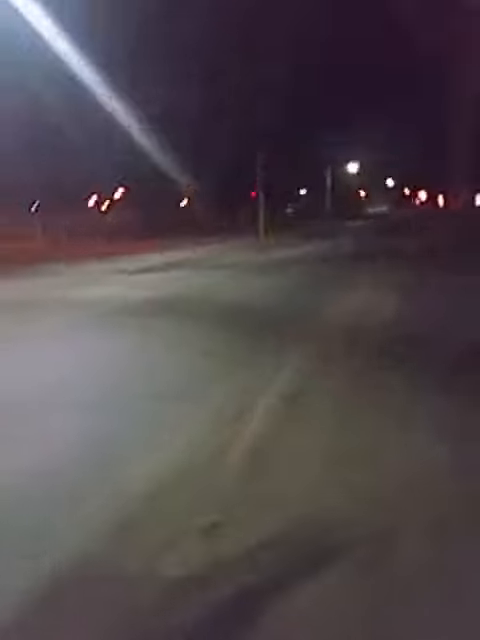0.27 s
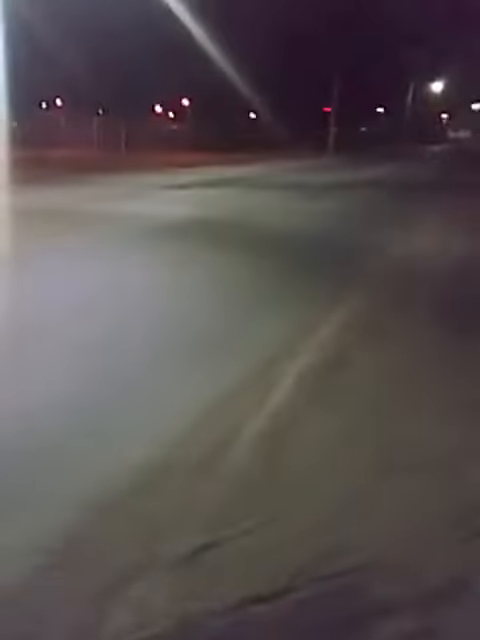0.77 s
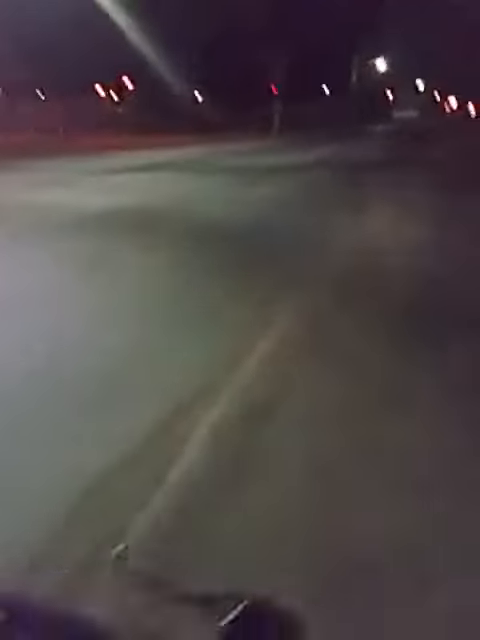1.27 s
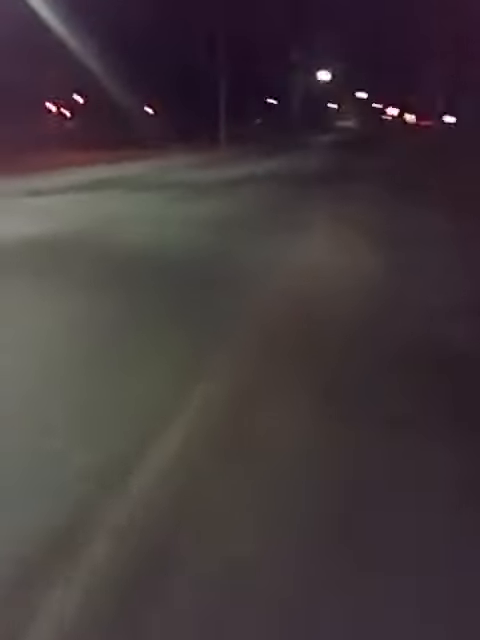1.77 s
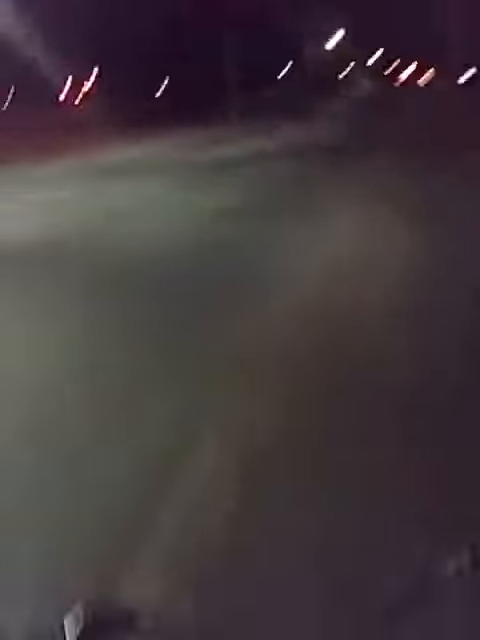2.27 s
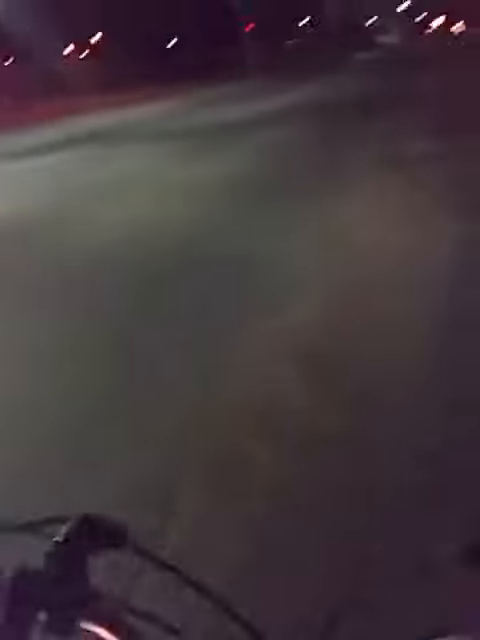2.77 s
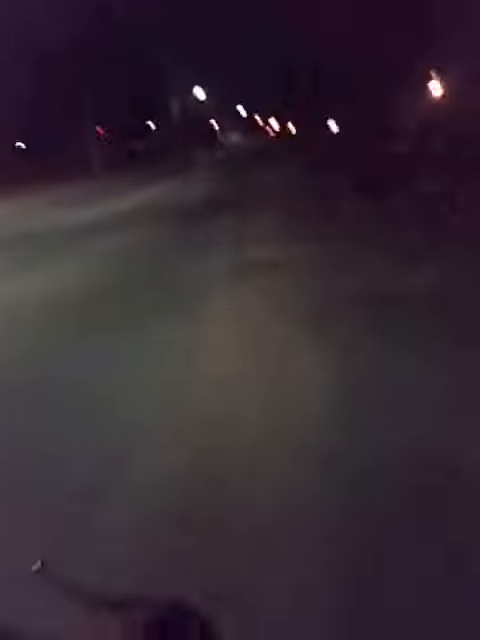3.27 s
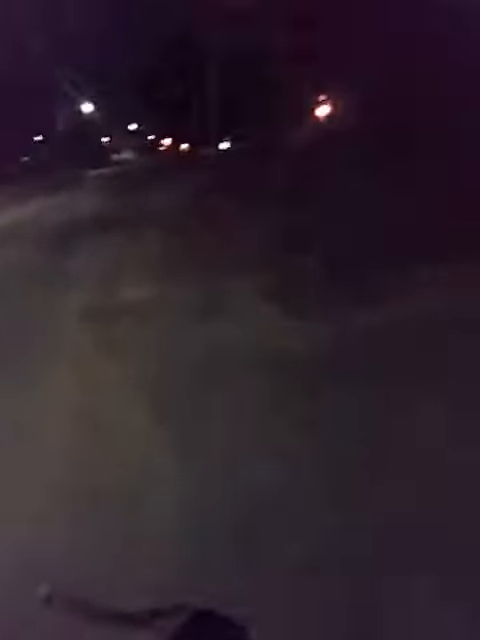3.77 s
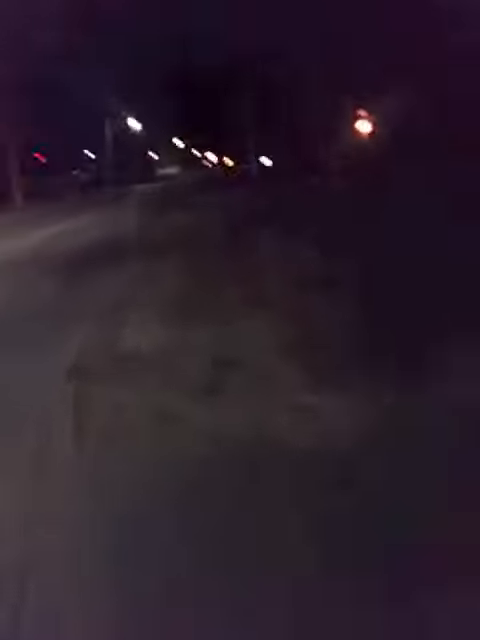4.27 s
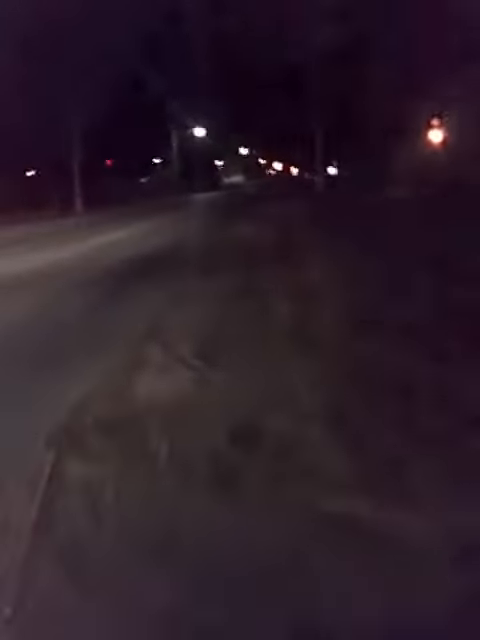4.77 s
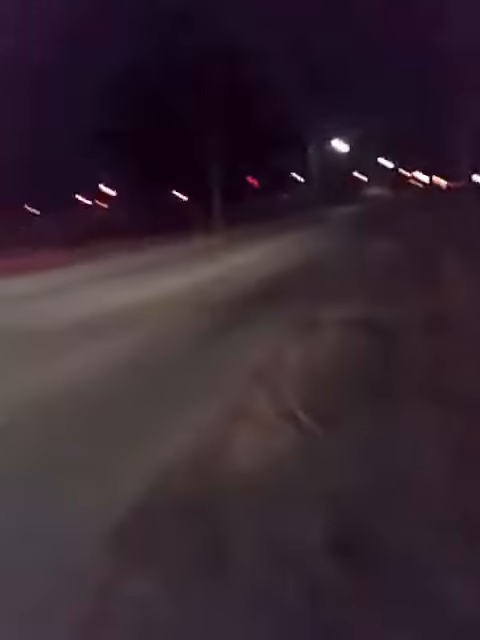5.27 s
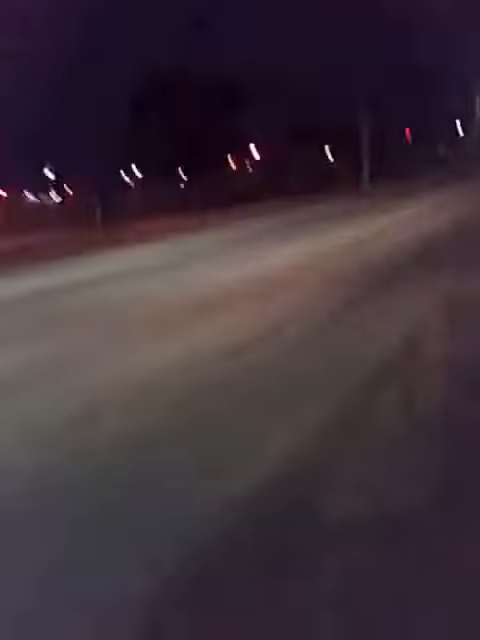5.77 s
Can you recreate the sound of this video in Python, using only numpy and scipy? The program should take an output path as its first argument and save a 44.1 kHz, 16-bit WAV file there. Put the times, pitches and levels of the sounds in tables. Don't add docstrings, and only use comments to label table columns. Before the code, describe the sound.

Small motorbike engine drones low and slowly climbs while wind thumps, a stiff jacket crackles, a buckle ticks, and a car's tyre roar swells.

```python
import sys
import numpy as np
from scipy import signal
from scipy.fft import rfft, irfft, next_fast_len
from scipy.io import wavfile
from scipy.ndimage import map_coordinates

SR = 44100
rng = np.random.default_rng(int(sys.argv[2]) if len(sys.argv) > 2 else 0)


def wav_out(sig):
    wavfile.write(sys.argv[1], SR, np.round(np.clip(np.atleast_2d(sig).T, -1, 1) * 32767).astype(np.int16))


def volts(x):
    e = np.asarray(x, float) / 20
    return 10 ** e


N = 266408
CONTROL_S = np.arange(0, 6.1, .002)
START_S, FADE_S = .4, 1.553


def unit(x):
    return x / np.sqrt(np.mean(x ** 2, axis=-1, keepdims=True) + 1e-20)


def along(points, hz):
    f, v = np.transpose(points)
    return np.interp(np.log(hz + 1), np.log(f + 1), v)


def curves(rows):
    s, *cols = np.transpose(rows)
    return [np.interp(np.arange(N) / SR, s, c) for c in cols]


def smooth(rows):
    return np.array(curves(np.transpose([CONTROL_S, *rows])))


def bumps(rows):
    changes = 0
    for s, length, *db in rows:
        changes = changes + np.exp(-((CONTROL_S - s) * 2 / length) ** 2) * np.array(db)[:, None]
    return smooth(changes)


def eddies(rows, half_s):
    size = 0
    for s, db, side_db in rows:
        bell = np.exp(-((CONTROL_S - s) / half_s) ** 2)
        size = size + volts(db) * panned(side_db)[:, None] * bell
    return smooth(size)


def wobble(rate):
    knots = rng.standard_normal(int(N * rate / SR) + 4)
    return map_coordinates(knots, [np.arange(N) * rate / SR])


def filtered(x, response):
    m = next_fast_len(N + 8192)
    return irfft(rfft(x, m) * response(np.fft.rfftfreq(m, 1 / SR)), m)[..., :N]


def coloured(x, spectrum):
    return unit(filtered(x, lambda hz: volts(along(spectrum, hz))))


def noise():
    return rng.standard_normal((2, N))


def panned(pan_db):
    pair = volts(np.array([pan_db / 2, -pan_db / 2]))
    return pair / np.sqrt(np.mean(pair ** 2, axis=0))


def lagged(x, seconds):
    return filtered(x, lambda hz: np.exp(-1j * np.pi * hz * seconds * np.array([[1], [-1]])))


# time_s, roar_db, treble_lift_db
CAR = [
    (.4, -44, 8),
    (1.2, -47.5, 14.5),
    (1.8, -45, -0.5),
    (3.34, -47.5, 2.5),
    (3.84, -40, -1),
    (4.83, -44, 6.5),
    (5.6, -37.5, 6.5),
    (6.04, -34.5, 8.5),
]
# frequency_hz, density_db
TYRES = [(200, -6), (400, 1.5), (800, 6), (1050, -1), (1300, -8), (1750, -12.5), (2200, -18), (3500, -29),
         (8000, -37)]


def car():
    level_db, bright_db = curves(CAR)
    direct_share = np.clip(curves([(2.6, 0.17), (3.6, 0.41), (5.2, 0.63), (5.8, 0.88)])[0], 0, 1)
    roar = rng.standard_normal((3, N)) * volts(0.53 * wobble(30))

    def around_rider(hz):
        phase = np.interp(hz, [700, 950, 1410, 2260], [0, .4, .8, 2.8])
        return np.exp(.5j * phase * np.array([[-1], [1]]))

    direct = filtered(roar[0], around_rider)
    scattered = filtered(roar[1:], lambda hz: 1 / (1 + (700 / (hz + 1)) ** 2))
    pair = np.sqrt(direct_share) * direct + np.sqrt(1 - direct_share) * scattered
    low = filtered(coloured(pair, TYRES), lambda hz: 1 + 0.51 / (1 + ((hz - 966) / 26) ** 2))
    high = filtered(low, lambda hz: 1 / (1 + (1250 / (hz + 1)) ** 6))
    return volts(level_db + 2.0) * (low + (volts(bright_db) - 1) * high) * volts([[1.2], [-1.2]])


# time_s, level_db
HISS = [(.4, -32), (.7, -27), (.8, -25), (1.0, -33), (1.18, -35), (1.24, -56), (1.6, -60), (1.78, -32),
        (1.9, -32), (2.1, -29), (2.2, -35), (2.27, -59), (2.6, -44), (3.6, -43), (4.4, -61), (5.0, -60),
        (6.04, -32.5)]
# frequency_hz, density_db
AIR = [(1500, -29), (2500, 4), (4000, -0.5), (6000, -6.5), (8000, -4), (12500, -1), (14500, 10),
       (15800, -4)]


def hiss():
    level_db, = curves(HISS)
    return volts(level_db + 0.94 * wobble(30.4)) * coloured(noise(), AIR) * volts([[0], [-6]])


# centre_s, peak_db, quarter_of_left_minus_right_db
FLICKS = [(0.699, -27, -4), (0.759, -40, -8), (0.869, -24.5, 3), (0.919, -30, 4), (1.099, -48, 1),
          (1.179, -24, -11), (1.319, -26, -2), (1.389, -18.5, -12.0), (1.459, -18, -6), (1.649, -29, -11),
          (1.755, -20, -14.5), (1.823, -19.5, -8), (2.036, -20, -12), (2.095, -21.5, -10), (2.208, -15, -9),
          (2.241, -16, -10.5), (2.365, -26, 2), (2.615, -37, 1), (2.69, -33, -1), (3.099, -27, -3),
          (3.229, -29, -4), (3.569, -22, -11), (4.069, -28, -1), (4.399, -30, -4), (4.481, -21, -2),
          (4.569, -22, -10), (4.899, -35, -3), (5.079, -27, -2)]
# frequency_hz, density_db
FLICK = [(60, -26), (120, 14.5), (300, 6), (500, -5.5), (800, -20), (1500, -45)]


def flicks():
    rows = []
    for s, db, side_db in FLICKS:
        fade_db = 20 * np.log10(min((s - START_S) / FADE_S, 1))
        rows.append((s, db - fade_db, 4 * side_db))
    return volts(0.5) * eddies(rows, 0.015) * coloured(noise(), FLICK)


# time_s, buffeting_db, left_minus_right_db, large_eddies_db
WIND = [(.4, -14.5, -22, -6), (.6, -22.5, -17, 0), (.75, -12, -9, -7), (1.0, -17.5, 14, -6),
        (1.25, -24, -14, 5), (1.46, -18.5, -23, -8), (1.6, -21.5, -22, 5), (1.8, -19.5, -14, -5),
        (2.0, -24.5, -9, -1), (2.2, -24, -5, 2), (2.6, -30.5, 3, 6), (3.05, -33, 6, 10),
        (3.45, -30.5, -6, -4), (3.85, -33, -9, 1), (4.2, -32, -6, 3), (4.55, -31, -22, -2),
        (4.9, -31, -10, 6), (5.3, -33, 0, 1), (5.8, -38, 14, 8)]
# centre_s, peak_db, left_minus_right_db
GUSTS = [(0.937, -14, -12), (1.011, -1.5, 20), (2.404, -17, -11), (3.034, -23, -10), (3.34, -15, -16),
         (3.433, -12.5, -22), (3.562, -15, -4), (3.717, -19, 10), (3.882, -19.5, -17), (4.086, -21, -3),
         (4.361, -30, -9), (4.58, -18, 7), (4.664, -24, -14), (5.583, -20, -20)]
# frequency_hz, density_db
BUFFET = [(15, -33), (35, -3.5), (70, 1), (130, 4), (250, -8.5), (500, -26), (1000, -48), (2500, -56)]


def wind():
    sway = np.array([.8 * wobble(8), 2.5 * wobble(8), 0.6 * wobble(4.7)])
    level_db, pan_db, deep_db = curves(WIND) + sway
    lumps = unit(volts([.8 * wobble(18) + 2.2 * wobble(45) for _ in "LR"]))
    size = volts(level_db + 5.0) * panned(pan_db) * lumps
    size = size + volts(-3.0) * eddies(GUSTS, 0.02)
    beats = filtered(size * noise(), lambda hz: volts(along(BUFFET, hz)))
    bright = np.clip((level_db + 25.0) / 8, 0, 1.5)
    small = filtered(beats, lambda hz: 1 / (1 + (260 / (hz + 1)) ** 4))
    beats = beats + (volts(2.6 * bright - 7.5) - 1) * small
    large = filtered(beats, lambda hz: 1 / (1 + (hz / 62) ** 6))
    beats = beats + (volts(deep_db) - 1) * large
    return beats * np.sqrt(np.mean(size ** 2) / np.mean(beats ** 2))


# start_s, peak_db
TAP = (.639, -.3)


def tap():
    start_s, peak_db = TAP
    u = np.clip(np.arange(N) / SR - start_s, 0, None)
    push = (1 - np.exp(-u / 0.000062)) * np.exp(-u / 0.0029) * np.cos(2 * np.pi * 110 * u)
    return volts(peak_db) * push * volts([[0], [-20]])


# start_s, peak_db, pitch_hz
TICKS = [(1.2166, -20, 2530), (1.6709, -20.5, 2740), (2.158, -21.5, 3200), (2.235, -26, 3020),
         (2.392, -28.5, 2240), (2.747, -19, 2500), (2.77, -25, 3400), (1.3902, -24.5, 3150),
         (2.4752, -25, 2010), (2.755, -10.5, 2530), (2.7807, -12.5, 2350), (2.861, -6, 3000),
         (2.926, -19.5, 2580), (3.2406, -22, 3320), (3.276, -24, 2330), (3.78, -17, 3000)]


def buckle():
    sag_per_s = 29
    lag_s = .00032
    out, t = np.zeros((2, N + SR)), np.arange(SR // 50) / SR
    for s, db, hz in TICKS:
        decay = volts(-60 * t / [[.0045], [.0036]])
        ring = decay * np.sin(2 * np.pi * hz * t * [[1.04], [.8]] * (1 - sag_per_s * t))
        out[:, round(s * SR):][:, :len(t)] += volts(db + 11) * (1 - np.exp(-t / 0.0007)) * ring
    upper = lagged(out[0, :N], lag_s) * volts([[-2.5], [1.5]])
    lower = lagged(out[1, :N], lag_s) * volts([[-1.5], [-9]])
    return upper + lower


# start_s, length_s, crisp_db, left_minus_right_db, rub_over_crisp_db
STROKES = [(0.404, 0.14, -24, -15, -10), (0.52, .2, -31, -10, -8), (.69, 0.15, -23.5, -14, -18),
           (0.873, 0.11, -31, -6, -18), (0.973, 0.22, -31, -9, -11.5), (1.296, 0.035, -28.5, -12, -5),
           (1.347, .2, -39.5, -16, -6.5), (1.58, 0.073, -34.5, -14, -6), (1.645, 0.083, -32.5, -17, -2),
           (1.719, 0.076, -32, -7, -5), (1.796, 0.12, -37, 10, -3.5), (1.91, .11, -37.5, 6, 1),
           (2.031, 0.062, -30.5, -6, -3.5), (2.111, 0.1, -34.5, -14, 0), (2.216, 0.1, -51, -2, 2),
           (2.398, 0.19, -39.5, -3.5, -2), (2.52, 0.21, -36.5, -10, -3.5), (2.741, 0.11, -35.5, -10, -3),
           (2.862, 0.12, -33.5, -10, -5), (2.992, 0.088, -32.5, -5, -11), (3.052, 0.14, -32.5, -7, -7),
           (3.191, 0.11, -33, -22, -4.5), (3.305, 0.15, -34.5, -24, -6), (3.412, .19, -33, -12, -10),
           (3.637, 0.15, -33, -14, -7), (3.767, 0.082, -28.5, -14, -12.5), (3.856, 0.044, -32.5, -15, -8),
           (3.92, 0.14, -38, -18, -7.5), (4.081, 0.083, -31.5, -10, -8), (4.18, 0.11, -36.5, -9, -29),
           (4.32, 0.13, -40.5, -10, -25), (4.472, 0.12, -32, -9, -12), (4.588, 0.24, -42, -12, -10),
           (4.795, 0.11, -33.5, -13.5, -7), (4.931, 0.06, -37, -17, -25), (5.035, 0.051, -28, -9, -11),
           (5.13, 0.067, -37.5, -8, -7), (5.207, 0.081, -37.5, -12, -10), (5.302, 0.22, -33, -11, -9),
           (5.554, 0.11, -42, -10, -9), (4.726, 0.077, -44, -10, -10), (5.665, 0.31, -31.5, -9.5, -8.5)]


def strokes():
    attack_s, release_s = 0.046, 0.067
    flapping = (-1, 9, -42.5, -26, -3.5)
    t, power = CONTROL_S, 0
    for s, length, db, pan_db, rub_db in STROKES + [flapping]:
        rise, fall = (t - s) / attack_s, (s + length + release_s - t) / release_s
        shape = np.clip(np.minimum(rise, fall), 0, 1) ** 1.16
        gains = volts(db) * np.append(panned(pan_db), volts(rub_db))
        power = power + (gains[:, None] * shape) ** 2
    gains = smooth(np.sqrt(power))
    return gains[:2], gains[2]


# start_s, peak_db, left_minus_right_db, body_db
SNAPS = [(.448, -4, -16, -32), (0.477, -3, -18, -28), (.512, -2, -18, -26), (0.7926, -10, -12, -33),
         (0.837, -9, -8, -26), (1.0198, -13, -12, -17), (1.2424, -19, -8, -10.5), (1.341, -10, -6, -17),
         (1.465, -21, -10, -27), (1.5983, -19, -12, -31), (1.676, -22, -12, -25), (1.7265, -23, -11, -25),
         (1.946, -15, 1, -22), (2.007, -17, -1, -22), (2.395, -27, -4, -26), (3.1498, -16.5, -4, -15),
         (3.252, -12, -13, -28), (3.6912, -28, -9.5, -31), (3.9675, -18.5, -9, -23), (4.2612, -19, -5, -36),
         (4.412, -28, -9, -25), (5.173, -22, -8, -32), (5.441, -16.5, -7, -24), (5.5768, -20, -11, -17),
         (1.1533, -5, -13, -35), (1.2687, -17, -9, -18), (1.322, -16, -11, -21), (1.6917, -9, -15, -36),
         (1.813, -14, -6, -31), (2.1064, -10, -9, -25), (2.315, -15, -5, -27), (2.3377, -15.5, -2, -23),
         (2.7643, -14, -5, -21), (3.0087, -14.5, -8, -37), (3.088, -17, -4, -29), (3.4634, -16, -7, -29),
         (3.4893, -13, -12, -22), (3.516, -15, -13, -30), (3.545, -14.5, -8.5, -20), (3.897, -15, -6, -31),
         (4.326, -4.5, -8, -30), (4.5033, -19, -12, -28), (4.565, -17.5, -11, -17.5),
         (4.638, -18, -16, -16), (4.7162, -15, -13, -21), (4.9454, -13.5, -14, -27), (5.044, -17, -11, -27),
         (5.773, -8, -11, -33), (5.864, -9, -12, -37), (5.92, -18, -15, -30)]
# start_s, peak_db, left_minus_right_db
CREASES = [(0.7472, -27, -4.0), (1.175, -16, -6.5), (1.7044, -18, -10.5), (2.6683, -23, -11),
           (2.7916, -24, -5), (3.052, -28, -6.5), (3.2735, -25, -11.5), (3.4191, -22, -10.0),
           (4.3417, -24, -8.0), (4.4862, -30, -11.0), (4.6124, -24, -10.0), (4.7074, -28, -10),
           (4.9084, -19, -8.5), (5.0753, -21, -9.5), (5.4627, -26, -9.0), (5.675, -22, -8.0),
           (5.9199, -28, -7.5)]
# frequency_hz, density_db
CRISP = [(4000, -14), (6000, -6.5), (7500, 1), (11000, 1.5), (15800, 3)]
# frequency_hz, density_db
RUB = [(700, -71), (1200, 0), (1700, -3.5), (3300, 3.5), (4800, -2.5), (6500, -6), (9000, -6)]


def cloth_snaps():
    t = np.arange(SR // 40) / SR
    tail = 0.16 * (1 - np.exp(-t / .002)) * np.exp(-t / 0.006)
    burst = np.exp(-((t - .0016) / .00095) ** 2) + tail
    top, body = np.zeros((2, 2, N + len(t)))
    for s, db, side_db, body_db in SNAPS + [(s, db + 2, side_db, -40) for s, db, side_db in CREASES]:
        i = round(s * SR)
        top[:, i:i + len(t)] += volts(db) * panned(side_db)[:, None] * burst
        body[:, i:i + len(t)] += volts(db + body_db) * burst
    crisp = filtered(coloured(noise(), CRISP), lambda hz: .5 + .55 / (1 + (8800 / (hz + 1)) ** 8))
    return volts(-4.0) * top[:, :N] * crisp + volts(4.5) * body[:, :N] * coloured(noise(), RUB)


def jacket():
    crisp_gain, rub_gain = strokes()
    clumps = .6 * wobble(25) + 1.1 * wobble(110)
    fibres = volts(clumps * [[.7], [1.1]] + [7.0 * wobble(480), 3.9 * wobble(480)])
    crisp = coloured(fibres * noise(), CRISP)
    rub = coloured(volts(1.57 * clumps + 2.1 * wobble(200)) * noise(), RUB)
    rubbing = volts(1.5) * rub_gain * rub * volts([[-.7], [.7]])
    return volts(2.0) * crisp_gain * crisp + rubbing + cloth_snaps()


# time_s, rasp_db, rumble_over_rasp_db
LOAD = [(.4, -29.5, -13), (1.0, -31.5, 6), (1.3, -34.5, 5), (2.2, -34, -2.5), (3.0, -35, -3),
        (3.76, -32, -1), (4.15, -29, -14), (4.6, -33.5, -8), (5.0, -35, 2.5), (5.57, -40.5, 10.5),
        (6.04, -31, -6)]
# frequency_hz, density_db
PIPE = [(25, -18), (60, -14.5), (120, -1), (220, -10), (330, -12.5), (500, -23), (900, -42.5), (2000, -62)]


def uneven_firing(turns, load_db, rumble_db):
    fired = np.flatnonzero(np.diff(np.floor(turns)))
    scatter = np.zeros(N)
    scatter[fired] = rng.standard_normal(N)[fired]
    puff = (3.7 + np.cos(2 * np.pi * turns)) * rng.standard_normal(N)
    uneven = unit(0.44 * coloured(scatter, PIPE) + 1.08 * coloured(puff, PIPE))
    deep = filtered(uneven, lambda hz: 1 / (1 + (hz / 230) ** 6))
    return volts(load_db + 9.0) * (uneven + (volts(rumble_db) - 1) * deep)


# time_s, firing_rate_hz
SPEED = [(.4, 79.5), (1.9, 81.83), (2.45, 82.43), (3.05, 83.58), (3.3, 85.53), (3.5, 85.1), (3.8, 85.28),
         (4.7, 87.74), (5.0, 89.04), (5.2, 88.4), (5.35, 88.95), (5.55, 88.15), (5.9, 88.65), (6.04, 90.3)]
# frequency_hz, level_db
EXHAUST = [(80, -17), (85, -24), (88, -11.5), (162, -17), (169, -16), (177, -22.5), (240, -29.5),
           (265, -27.5)]
# multiple_of_firing_rate, over_load_db
UPPER = [(.5, -20), (1.5, -17), (2.5, -14), (4, -4.5), (5, -14)]
# centre_s, length_s, first_db, second_db
BOBS = [(.73, 0.081, 5, -10.5), (1.1, 0.52, -1, 7), (1.38, 0.21, -26, -11), (1.57, 0.14, -15, -8),
        (1.78, 0.12, -15, 4), (1.89, 0.13, -4.5, -8), (2.12, 0.31, -23, 0.5), (2.46, 0.12, 1.5, -4.5),
        (2.86, 0.18, -1.5, 4), (3.33, 0.15, -5, 5.5), (3.415, 0.022, -13, -20), (3.745, .03, -18, -4),
        (4.69, 0.051, -2, -8), (4.78, 0.085, -1, 5), (5.0, 0.083, -1, 2.5), (5.66, 0.027, 0, -13),
        (2.3, 0.065, 7, 1), (3.66, 0.16, 5, -7), (3.79, 0.18, -6, 6.5), (3.96, 0.19, 5.5, -14),
        (4.08, 0.065, 0.5, 6.5), (4.21, 0.064, 1.5, -9), (4.36, 0.13, 0, 5.5), (4.49, 0.073, -2, -10),
        (4.6, 0.12, -5.5, 7.5), (4.88, 0.1, 0.5, -8), (5.17, 0.21, -3, 4.5), (5.63, 0.22, 1.5, -10),
        (5.84, 0.099, 0.5, 0.5), (5.97, 0.39, -6, -1.5)]
# centre_s, length_s, change_db
THIRD_DIPS = [(.75, 0.67, -18), (1.05, 0.059, -16), (1.29, 0.087, -27), (1.8, 0.17, -7.5),
              (2.12, 0.034, -9), (2.33, 0.084, -17), (2.47, 0.06, -10), (2.7, .04, -4), (3.0, 0.047, -9),
              (3.62, 0.054, -18), (3.77, 0.16, -27), (4.19, 0.24, -5), (4.69, 0.068, -16), (5.05, 0.1, -12),
              (5.48, 0.18, -12), (6.0, 0.057, -39)]
# centre_s, length_s, change_db
FOURTH_BOBS = [(1.35, 0.1, -7), (2.05, .07, 6), (2.22, 0.093, 7.5), (2.36, .06, -8), (3.15, 0.47, -11),
               (3.58, .1, 1), (3.93, 0.067, -10), (4.4, 0.11, -8), (4.65, 0.12, -16), (4.97, .1, 5),
               (5.2, 0.059, -10), (5.5, 0.33, -11), (5.97, .1, 2.5), (4.6, 2.5, -4)]


def engine():
    hz, = curves(SPEED)
    load_db, rumble_db = curves(LOAD)
    turns = np.cumsum(hz * (1 + .004 * wobble(14))) / SR
    bob_db = [*bumps(BOBS), *bumps(THIRD_DIPS)]
    fourth_db, = bumps(FOURTH_BOBS)
    slip = np.cumsum(3.6 * np.clip((-8 - bob_db[1]) / 4, 0, 1)) / SR

    def tone(order, db, drift, slipped=0):
        phase = 2 * np.pi * (order * turns - slipped) + drift * wobble(5)
        return np.sqrt(2) * volts(db) * np.cos(phase)

    lines = np.zeros(N)
    for k, echo_db in enumerate(bob_db):
        flutter_db = (0.41 + 0.29 * k * k) * wobble(16)
        order_db = along(EXHAUST, (k + 1) * hz) + echo_db + flutter_db
        lines += tone(k + 1, order_db, .5, slip * (k == 1))
    for order, db in UPPER:
        order_db = load_db + db + fourth_db * (order == 4) + 1.0 * wobble(7)
        lines += tone(order, order_db, 1.4)
    return lines + uneven_firing(turns, load_db, rumble_db)


def scene():
    background = car() + hiss() + flicks() + wind()
    handling = tap() + buckle() + jacket()
    return background + handling + engine() * volts([[-.55], [.55]])


def low_pass(x):
    return signal.sosfilt(signal.butter(12, 16520, fs=SR, output="sos"), x)


# frequency_hz, gain_db
LEFT_PORT = [(1000, -0.5), (2200, 0.5), (4200, -10), (5600, -8), (7000, -4), (8200, 3.5), (10500, -2),
             (12000, 0.5), (14000, -9), (15800, -1)]
# frequency_hz, gain_db
RIGHT_PORT = [(900, -1), (1250, -3), (1650, 3.5), (2350, -6.5), (3350, -1.5), (4000, -3), (4800, 1.5),
              (5600, -4.5), (6500, -3), (7250, -11.5), (8800, -13), (11000, 4), (13500, -3.5),
              (15000, -5.5)]


def record(dry):
    opened = np.clip((np.arange(N) / SR - START_S) / FADE_S, 0, 1) ** 1.113
    ports = filtered(dry * opened, lambda hz: volts([along(LEFT_PORT, hz), along(RIGHT_PORT, hz)]))
    held = ports / (1 + np.abs(ports / .8) ** 4) ** (1 / 4)
    mix = filtered(held, lambda hz: hz < 15850) * (opened > 0)
    return low_pass(mix)


dry = scene()
out = record(dry)
wav_out(out)
```